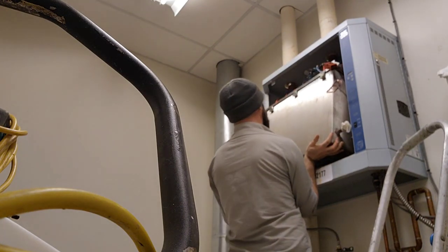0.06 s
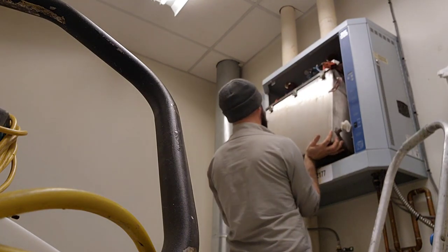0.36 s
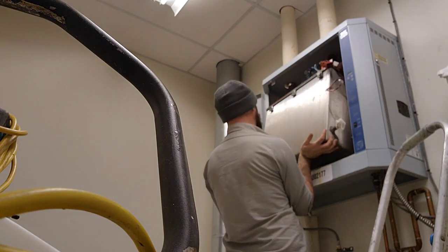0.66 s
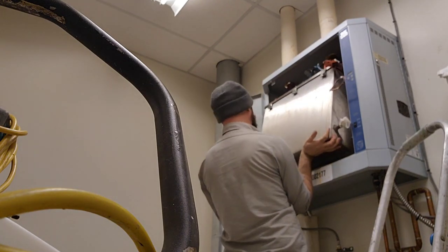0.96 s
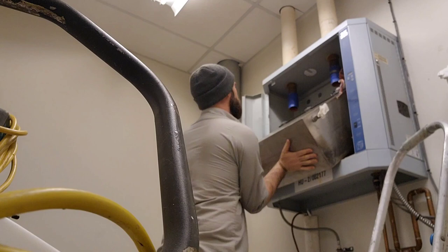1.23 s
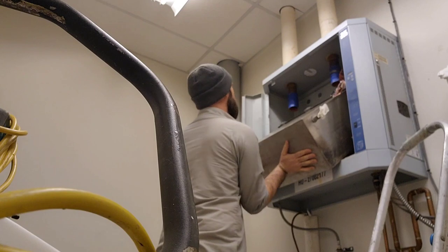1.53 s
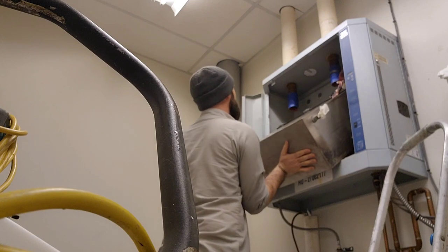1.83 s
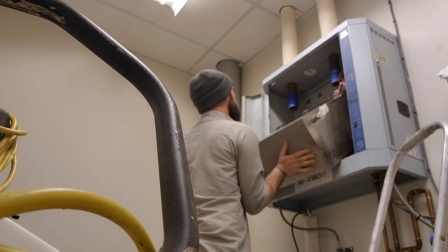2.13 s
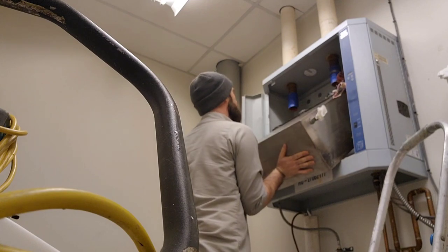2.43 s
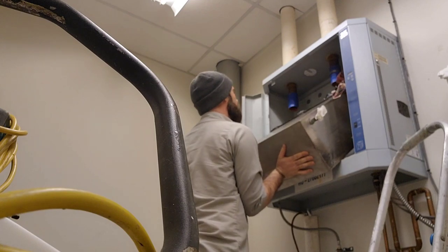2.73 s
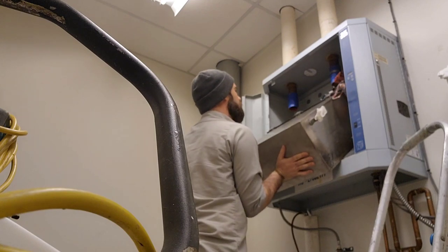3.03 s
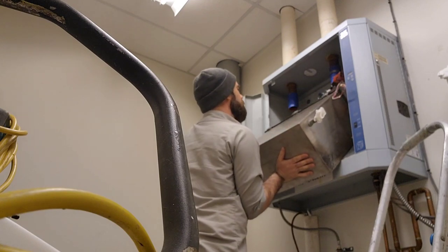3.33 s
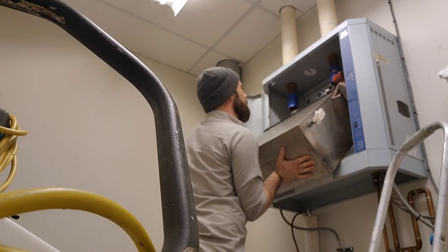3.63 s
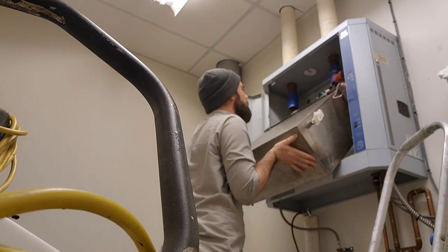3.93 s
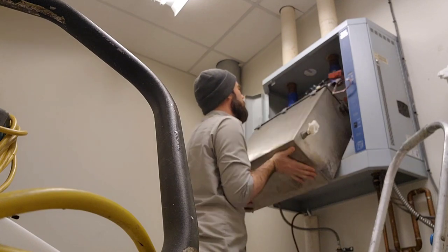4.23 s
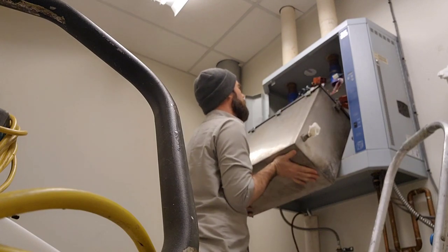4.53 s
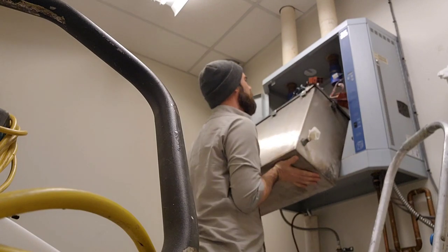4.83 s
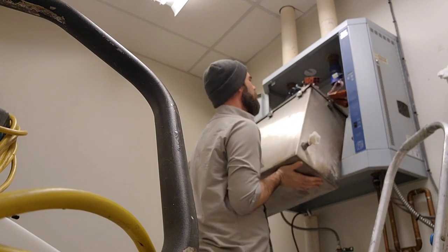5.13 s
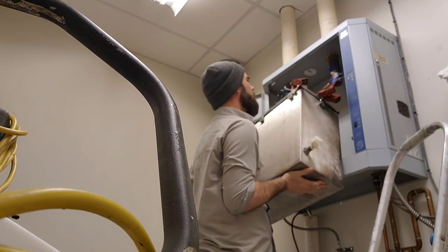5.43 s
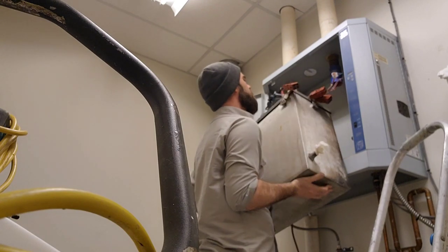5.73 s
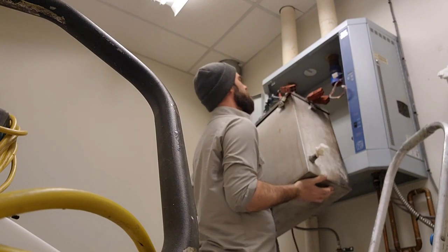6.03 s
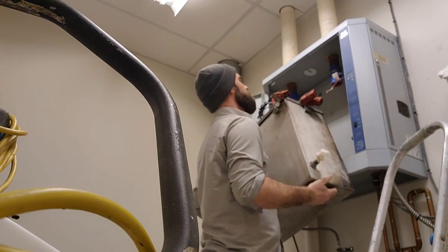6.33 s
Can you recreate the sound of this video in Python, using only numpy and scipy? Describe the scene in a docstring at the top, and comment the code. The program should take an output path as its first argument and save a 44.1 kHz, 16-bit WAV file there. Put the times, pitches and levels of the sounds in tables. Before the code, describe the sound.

A steady ventilation rumble with a low hum fills a small, hard-walled room. From the start, a sheet-metal tank scuffs and bumps on a steel cabinet shelf, slightly to the right, its panels booming hollowly, with a firmer knock at about 1.1 seconds. Softer shoves and faint chirps of rubbed metal continue until 3 seconds. Then a clang sets off a loud, wavering squeal lasting to about 3.6 seconds. A cluster of knocks comes around 4 seconds, followed by a tick and a deep thump at 4.4. A short, high squeak cuts in at about 4.8 seconds, ending in a clank. From 5.1 seconds an edge grates in a harsh, loud judder, closing with a booming clang at 5.3. Only light scuffs and two soft bumps follow, near 5.8 and 6.2 seconds, over the ventilation.

```python
"""A small, hard-walled room: a sheet-metal tank is worked out of its steel wall cabinet.
Ventilation rumbles underneath. The tank scuffs and bumps on the shelf, so its panels boom and its
edge clangs; rubbed metal chirps and a corner ticks past the cabinet's lip. Three times an edge
sticks and slips on the lip: a long squeal, a short high squeak and a harsh judder."""
import sys
import numpy as np
from scipy import signal
from scipy.fft import rfft, irfft, next_fast_len
from scipy.io import wavfile
from scipy.ndimage import uniform_filter1d

SR = 44100
rng = np.random.default_rng(int(sys.argv[2]) if len(sys.argv) > 2 else 0)


def store_wav(level_fs):
    """Save 16-bit WAV to argv[1]."""
    pcm = np.round(np.clip(np.atleast_2d(level_fs), -1, 1) * 32767)
    wavfile.write(sys.argv[1], SR, pcm.T.astype(np.int16))


N = 281335

# Table levels are relative; each source adds its own offsets.
# left-right likeness of the diffuse field: freq_hz, correlation
ROOM_COHERENCE = [(60, 0.84), (150, 1), (300, 0.83), (600, 0.0062), (1100, -0.32), (2500, -0.087),
                  (6000, -0.14), (13000, 0.98)]
AIR_COHERENCE = [(60, 0.95), (150, 1), (300, 0.24), (700, 0.12), (2000, 0.05), (5000, 0.14), (8000, .85),
                 (14000, 0.96)]
# noise spectra: freq_hz, density_db
AIR_SPECTRUM = [(20, -13.5), (52, 0.5), (70, -6.5), (100, 2.5), (160, -13.5), (300, -22.5), (500, -28),
                (1000, -36.5), (2000, -40.5), (3000, -41.5), (6300, -47), (10000, -45.5), (12500, -36),
                (15800, -37.5)]
PANEL_SPECTRUM = [(30, -52), (60, -24.5), (130, 2), (220, 9.5), (340, 4), (450, -4.5), (650, -15),
                  (900, -8), (1500, -66), (4000, -80.5)]
CLANG_SPECTRUM = [(300, -22.5), (560, 5), (680, -1.5), (900, -8.5), (1250, -5), (1550, -3.5), (2000, -3),
                  (2700, -18.5), (4500, -22), (9000, -46.5), (16000, -48.5)]
RASP_SPECTRUM = [(40, -38.5), (200, -12), (600, 0.5), (1500, 7.5), (2400, -11.5), (3000, -1.5), (4000, -4),
                 (5500, -9), (7000, -8.5), (9500, -10), (11000, -6.5), (12500, -2), (15800, -7.5)]
# modes of the tank's panels and of its hollow metal ring: freq_hz, level_db, t60_s
PANEL_MODES = [(115.1, -5, 0.35), (149.2, 2.5, 0.2), (205, -3.5, 0.1), (227, -8.5, 0.21),
               (281.5, 4.5, 0.15), (298.6, 6, 0.13), (368.6, 10.5, 0.034), (426, 1.5, 0.15),
               (572, -9.5, 0.014), (566, 3, 0.01), (694, 1, 0.064), (761, -7.5, 0.16)]
RING_MODES = [(619, 23.5, 0.52), (687, 1.5, 0.19), (870, 9.5, 0.27), (1049, 10.5, .1), (1272, -39.5, 0.076),
              (1490, -12, 0.3), (1736, -15, 0.04), (2076, -8, 0.32)]
# shoves along the shelf: start_s, length_s, rumble_db, scrape_db
SHOVES = [(0.043, 0.16, -41, -40.5), (0.25, 0.18, -35.5, -47), (0.55, 0.22, -32.5, -43),
          (0.757, 0.089, -30, -42.5), (0.86, 0.15, -32.5, -50.5), (0.983, 0.25, -39, -39),
          (1.43, 0.16, -35.5, -55), (1.749, 0.19, -32, -46), (1.95, 0.3, -36, -51),
          (2.37, 0.25, -37.5, -48), (2.692, 0.26, -38.5, -50.5), (3.885, 0.31, -52, -44),
          (4.195, 0.23, -40.5, -39), (4.525, 0.17, -48, -48), (5.791, 0.11, -46, -61),
          (6.04, .3, -52.5, -54)]
# tank against cabinet: start_s, panel_db, boom_db, clang_db, contact_s
BUMPS = [(0.124, -21.5, -33, -40, 0.011), (0.181, -21.5, -24, -34.5, 0.02), (0.628, -22.5, -38, -43, 0.042),
         (0.659, -25.5, -27, -35.5, 0.032), (0.809, -29, -33, -41, 0.047), (1.087, -14.5, -23, -31, 0.025),
         (1.135, -24.5, -31, -46.5, 0.067), (1.273, -23.5, -30, -31.5, 0.0061),
         (1.949, -26, -26.5, -44, 0.0072), (3.016, -38, -28, -36, 0.015), (3.031, -33, -21.5, -22.5, .016),
         (3.51, -36, -43, -31, 0.02), (3.949, -19.5, -21, -35.5, 0.0076), (3.984, -20, -31, -40.5, 0.0047),
         (4.064, -28.5, -41.5, -55, 0.0067), (4.139, -28, -31, -47.5, 0.017),
         (4.394, -22, -14.5, -32.5, 0.028), (4.835, -33, -50, -19.5, 0.027),
         (5.278, -15.5, -22, -20, 0.017), (5.835, -36.5, -36.5, -49, 0.013), (6.164, -41, -40, -51, 0.0058)]
# rubbed metal: middle_s, length_s, pitch_hz, level_db, roughness (0-1)
RUB_CHIRPS = [(1.066, 0.08, 2410, -47.5, 0.2), (1.901, 0.21, 870, -34.5, 0.62),
              (2.225, 0.12, 838, -40, 0.54), (2.515, 0.23, 913, -39, 0.89),
              (2.622, 0.058, 1156, -32.5, 0.94), (4.748, 0.041, 1090, -13.5, 0.3),
              (5.105, 0.07, 1527, -16.5, 0.97), (5.24, .045, 529.4, -7.5, 0.25)]
# stick-slip slides: time_s, pitch_hz, fundamental_db, overtone_db
SQUEAL_CURVE = [(3.03, 558.5, -21, -38), (3.117, 557.2, -26, -19.5), (3.156, 562.5, -8, -15.5),
                (3.192, 551.4, -17, -16), (3.235, 559.6, -10.5, -13.5), (3.308, 563.6, -19.5, -23),
                (3.431, 566.7, -34.5, -20), (3.52, 566.8, -15, -17.5), (3.59, 572, -33.5, -68)]
SQUEAK_CURVE = [(4.685, 858, -33, -53), (4.714, 878, -33, -38), (4.744, 955.3, -13.5, -15),
                (4.767, 927, -29.5, -44), (4.789, 967, -24, -24), (4.806, 951.5, -22, -11),
                (4.827, 962, -12, -22.5), (4.86, 960, -50, -61.5)]
JUDDER_CURVE = [(5.06, 270.2, -57.5, -47), (5.078, 271.3, -40.5, -44), (5.094, 266.8, -23, -18),
                (5.121, 270.3, -11.5, -22), (5.16, 284.7, -14, -22), (5.204, 272.4, -20, -20),
                (5.234, 259.5, -48, -22.5), (5.28, 268.7, -48, -29.5), (5.32, 266, -50, -46)]
# their overtones: pitch_multiple, level_db
SQUEAL_OVERTONES = [(2, -0.5), (3, -8), (4, -15.5), (5, -17.5), (6, -20), (7, -34), (8, -31.5), (9, -36),
                    (12, -38), (16, -40.5)]
SQUEAK_OVERTONES = [(2, 2.5), (3, -11.5), (4, -19.5), (5, -19), (7, -39.5), (10, -39)]
JUDDER_OVERTONES = [(2, 2), (3, -18), (4, 7.5), (5, -5), (6, -9.5), (7, -3), (8, -8), (9, -9), (10, -9.5),
                    (13, -32), (20, -13)]

BOOM_HZ = 91.15  # the tank's deep boom mode


def from_db(db):
    """Decibels to gain."""
    return 10 ** (np.asarray(db) / 20)


def rms(x):
    """Root mean square."""
    return np.sqrt(np.mean(x ** 2) + 1e-20)


def at_hz(table, hz):
    """Read a table on a log-frequency axis."""
    freq_hz, values = np.transpose(table)
    return np.interp(np.log(np.maximum(hz, 1)), np.log(freq_hz), values)


def add(out, start_s, x):
    """Mix in a stereo sound."""
    i = max(round(start_s * SR), 0)
    out[:, i:i + x.shape[1]] += x[:, :N - i]


def drift(n, rate_hz):
    """Smooth random curve, spread about 1."""
    points = rng.standard_normal(8192) * np.sqrt(3 / 2)
    return np.interp(np.arange(n) * rate_hz / SR, np.arange(len(points)), points)


def filtered(x, gain_at):
    """Apply a gain given as a function of frequency."""
    n = x.shape[-1]
    size = next_fast_len(n + 2048)
    return irfft(rfft(x, size) * gain_at(np.fft.rfftfreq(size, 1 / SR)), size)[..., :n]


def coloured(x, spectrum):
    """Filter by a spectrum table."""
    return filtered(x, lambda hz: from_db(at_hz(spectrum, hz)))


def diffuse(n, coherence):
    """Stereo noise with a left-right correlation set by frequency."""
    mid = filtered(rng.standard_normal(n), lambda hz: np.sqrt((1 + at_hz(coherence, hz)) / 2))
    side = filtered(rng.standard_normal(n), lambda hz: np.sqrt((1 - at_hz(coherence, hz)) / 2))
    return np.array([mid + side, mid - side])


def ring(force, hz, t60_s):
    """One decaying mode."""
    radius, angle = from_db(-60 / (t60_s * SR)), 2 * np.pi * hz / SR
    return signal.lfilter([0, np.sin(angle)], [1, -2 * radius * np.cos(angle), radius ** 2], force + 1e-18)


def modes(force, table):
    """A metal part's modes, summed in alternating polarity."""
    return sum((-1) ** k * from_db(db) * ring(force, hz, t60_s) for k, (hz, db, t60_s) in enumerate(table))


def room_response(left_lag_s, t60_s=0.29, bass_t60_s=0.59, bass_hz=260, wet_db=2.5):
    """Direct sound, then a diffuse tail whose bass lasts longest."""
    t = np.arange(SR // 2) / SR
    noise = diffuse(len(t), ROOM_COHERENCE)
    bass = filtered(noise, lambda hz: 1 / (1 + (hz / bass_hz) ** 2) ** 2)
    tail = bass * from_db(-60 * t / bass_t60_s) + (noise - bass) * from_db(-60 * t / t60_s)
    response = tail * from_db(wet_db) / np.sqrt(np.sum(tail ** 2) / 2)
    response[0, round(left_lag_s * SR)] += 1
    response[1, 0] += 1
    return response


def in_room(x, room):
    """Reverberate; each ear gets the input's full energy."""
    wet = signal.fftconvolve(x[None], room, axes=1)
    return wet * np.sqrt(np.sum(x ** 2) / (np.sum(wet ** 2, axis=1, keepdims=True) + 1e-20))


def smoothed(power):
    """Power averaged twice over 25 ms."""
    return np.maximum(uniform_filter1d(uniform_filter1d(power, size=1100), size=1100), 0) + 1e-12


def tone_in_room(x, room):
    """Reflections blur a tone's phase; its power builds and dies with the room's decay."""
    wet = signal.fftconvolve(x[None], room, axes=1)
    decay = (room ** 2).mean(0)
    target_power = signal.fftconvolve(x ** 2, decay / decay.sum())
    wet_power = (2 * wet ** 2 + wet.mean(0) ** 2) / 3
    return wet * np.sqrt(smoothed(target_power) / smoothed(wet_power))


def ventilation(air_db=-38.5, hum_hz=91, hum_db=-47):
    """Steady rumble and hiss with a wavering low hum."""
    air = coloured(diffuse(N, AIR_COHERENCE), AIR_SPECTRUM)
    hum = ring(rng.standard_normal(N), hum_hz, t60_s=0.9)
    return from_db(air_db) * air / rms(air) + from_db(hum_db) * hum / rms(hum)


def grains(n, spread_db):
    """Tiny collisions of surface bumps: many weak, a few strong."""
    return rng.standard_normal(n) * from_db(spread_db * drift(n, 700))


def panels(force):
    """Thin tank walls: a few clear modes among many that the hands damp at once."""
    clear, dense = modes(force, PANEL_MODES), coloured(force, PANEL_SPECTRUM)
    return (clear / rms(clear) + dense / rms(dense)) / np.sqrt(2)


def clang(force, ring_db=-6):
    """Steel on steel: a dull scrape and the ring of the hollow tank."""
    scrape, lip = coloured(force, CLANG_SPECTRUM), modes(force, RING_MODES)
    return scrape / rms(scrape) + from_db(ring_db) * lip / rms(lip)


def shove_envelope(length_s, attack_s=0.083, sag_db_per_s=4.5, release_s=0.08):
    """One shove swells, slackens and dies away."""
    t = np.arange(round((length_s + 5 * release_s) * SR)) / SR
    attack = np.sin(np.pi / 2 * np.minimum(t / attack_s, 1)) ** 2
    hold = from_db(-sag_db_per_s * (t - length_s / 2))
    release = np.exp(-np.maximum(t - length_s, 0) / release_s)
    return attack * hold * release


def scuffs(room, flex_hz=53):
    """Sliding grains flex the tank, shake its panels and scrape at the contact."""
    power, out = np.zeros((2, N)), np.zeros((2, N))
    for start_s, length_s, rumble_db, scrape_db in SHOVES:
        add(power, start_s, (from_db([[rumble_db], [scrape_db]]) * shove_envelope(length_s)) ** 2)
    rumble, scrape = np.sqrt(power)
    force = grains(N, spread_db=2.5)
    layers = [(ring(force, flex_hz, t60_s=0.28), rumble, -2.5),
              (ring(force, BOOM_HZ, t60_s=0.21), rumble, -4.5),
              (panels(force), rumble, -1.5),
              (clang(force), scrape, -5),
              (coloured(force, RASP_SPECTRUM), scrape, -10)]
    for sound, envelope, offset_db in layers:
        add(out, 0, in_room(sound / rms(sound) * envelope * from_db(offset_db), room))
    return out


def bumps(room, bite_s=0.0012, push_s=0.00057, skid_ref_s=0.084):
    """A short chatter of contacts: the tank booms, its panels ring, the edge clangs and rasps."""
    out, t = np.zeros((2, N)), np.arange(SR // 3) / SR
    for start_s, panel_db, boom_db, clang_db, contact_s in BUMPS:
        force = grains(len(t), spread_db=0.5) * (1 - np.exp(-t / bite_s)) * np.exp(-t / contact_s)
        rasp_db = clang_db + 20 * np.log10(contact_s / skid_ref_s)  # longer skids rasp more
        layers = [(ring(np.exp(-t / push_s), BOOM_HZ, t60_s=0.35), boom_db - 4.5),
                  (panels(force), panel_db - 4),
                  (clang(force), clang_db - 2),
                  (coloured(force, RASP_SPECTRUM), rasp_db + 2.5)]
        for sound, level_db in layers:
            wet = in_room(sound, room)
            peak_rms = np.sqrt(uniform_filter1d((wet ** 2).mean(0), size=1300).max())
            add(out, start_s, wet * from_db(level_db) / peak_rms)
    return out


def slip_phase(pitch_hz, rough, jitter, wander=0.003):
    """Stick-slip phase: pitch wanders with the push; a rough contact lets go unevenly."""
    n = len(pitch_hz)
    pitch_ratio = 1 + wander * drift(n, 45) + jitter * rough * drift(n, 420)
    return 2 * np.pi * np.cumsum(pitch_hz * pitch_ratio) / SR


def chirps(room, flutter_db=2.5):
    """Friction briefly sets one resonance singing."""
    out = np.zeros((2, N))
    for middle_s, length_s, pitch_hz, level_db, rough in RUB_CHIRPS:
        n = round(length_s * SR)
        phase = slip_phase(np.full(n, pitch_hz), rough, jitter=0.13)
        tone = np.sin(phase) * from_db(flutter_db * rough * drift(n, 350))
        chirp = from_db(level_db) * np.hanning(n) * tone / rms(tone)
        add(out, middle_s - length_s / 2, tone_in_room(chirp, room))
    return out


def controls(curve):
    """A curve's columns, per sample over its own span."""
    time_s, *columns = np.transpose(curve)
    t = time_s[0] + np.arange(round((time_s[-1] - time_s[0]) * SR)) / SR
    return [np.interp(t, time_s, column) for column in columns]


def roughness(n, catch_s, settled, let_go_s=0.017):
    """Roughness 0-1: an edge grates as it catches, settles, and grates before letting go."""
    t = np.arange(n) / SR
    catch = np.exp(-(t / catch_s) ** 2)
    let_go = np.exp(-((t[-1] - t) / let_go_s) ** 2)
    return settled + (1 - settled) * np.maximum(catch, let_go)


def swell_db(n, depth_db):
    """Bounded rise and fall as the contact travels over the sheet; mean power is kept."""
    db = depth_db * np.tanh(drift(n, 28.6))
    return db - 20 * np.log10(rms(from_db(db)))


def stick_slip(curve, overtones, room, tone_db, rasp_db, snap_db, flutter_db,
               jitter, catch_s, settled, limp, rasp_follow):
    """An edge catches and lets go once a cycle: partials, plus a snap and a puff of rasp per slip."""
    pitch_hz, fundamental_db, overtone_db = controls(curve)
    multiples, partial_db = np.transpose(overtones)
    n = len(pitch_hz)
    rough = roughness(n, catch_s, settled)
    phase = slip_phase(pitch_hz, rough, jitter)
    tones = 0
    for k in range(1, round(multiples[-1]) + 1):
        db = fundamental_db
        if k > 1:
            db = overtone_db + np.interp(k, multiples, partial_db) + swell_db(n, 6.5 * (1 - 1 / k))
        gain = np.sqrt(2) * from_db(tone_db + db + flutter_db * rough * drift(n, 182.2))
        # limp: alternating strong and weak slips put lines half-way between the partials
        half_partial = limp * rough ** 1.5 / np.sqrt(k) * np.sin((k - 0.5) * phase)
        tones = tones + tone_in_room(gain * (np.sin(k * phase) + half_partial), room)
    slips = np.diff(np.floor(phase / (2 * np.pi)), prepend=0)
    snaps = slips * from_db(flutter_db * rough * drift(n, 500))
    puffs = grains(n, spread_db=4) * (1 + np.cos(phase)) ** 2
    rasp = coloured(puffs / rms(puffs) + from_db(snap_db) * snaps / rms(snaps), RASP_SPECTRUM)
    # rasp_follow: 0 tracks the fundamental, 1 the overtones
    envelope_db = fundamental_db + rasp_follow * (overtone_db - fundamental_db)
    return tones + in_room(rasp / rms(rasp) * from_db(envelope_db + rasp_db), room)


def slides(room):
    """An edge slides over the lip three times: squeal, squeak, judder."""
    squeal = stick_slip(SQUEAL_CURVE, SQUEAL_OVERTONES, room, tone_db=-1.5, rasp_db=-17.5, snap_db=-32,
                        flutter_db=0, jitter=0.035, catch_s=0.1, settled=0.14, limp=0.77, rasp_follow=1)
    squeak = stick_slip(SQUEAK_CURVE, SQUEAK_OVERTONES, room, tone_db=2.34, rasp_db=-6.5, snap_db=-15,
                        flutter_db=0.7, jitter=0.033, catch_s=0.014, settled=0.23, limp=0.15,
                        rasp_follow=0.25)
    judder = stick_slip(JUDDER_CURVE, JUDDER_OVERTONES, room, tone_db=-2, rasp_db=4.5, snap_db=-4.5,
                        flutter_db=8, jitter=0.022, catch_s=0.035, settled=0.18, limp=0.1, rasp_follow=1)
    out = np.zeros((2, N))
    add(out, SQUEAL_CURVE[0][0], squeal)
    add(out, SQUEAK_CURVE[0][0], squeak)
    add(out, JUDDER_CURVE[0][0], judder)
    return out


def tick(room, start_s=4.363, contact_s=0.002, snap_db=-24, ring_db=-30):
    """A hard corner snaps past the lip and leaves a thin ring."""
    out, t = np.zeros((2, N)), np.arange(SR // 5) / SR
    snap = from_db(snap_db) * rng.standard_normal(len(t)) * np.exp(-t / contact_s)
    ringing = from_db(ring_db) * ring(signal.unit_impulse(len(t)), hz=2160, t60_s=0.08)
    add(out, start_s, in_room(snap + ringing, room))
    return out


def scene(pan_db=0.97):
    """The tank, slightly right, over the ventilation; the squealing edge lies further right."""
    shelf, lip = room_response(left_lag_s=0), room_response(left_lag_s=0.00049)
    tank = scuffs(shelf) + bumps(shelf) + tick(shelf) + slides(lip) + chirps(lip)
    return tank * from_db([[-pan_db], [pan_db]]) + ventilation()


def record(dry, ceiling=0.85, cutoff_hz=15900):
    """Hard clip, then a steep low-pass."""
    lowpass = signal.ellip(12, 0.1, 80, cutoff_hz, fs=SR, output="sos")
    return signal.sosfilt(lowpass, np.clip(dry, -ceiling, ceiling))


dry = scene()
out = record(dry)
store_wav(out)
```